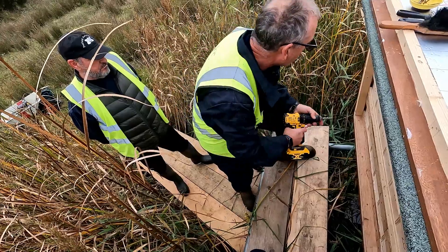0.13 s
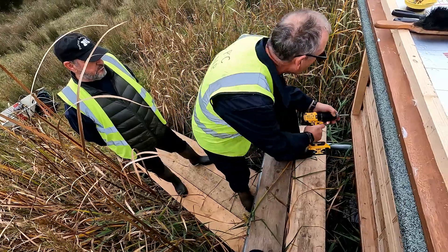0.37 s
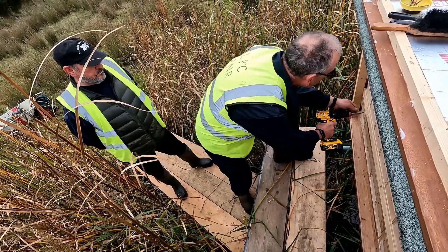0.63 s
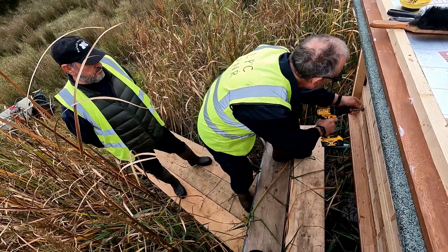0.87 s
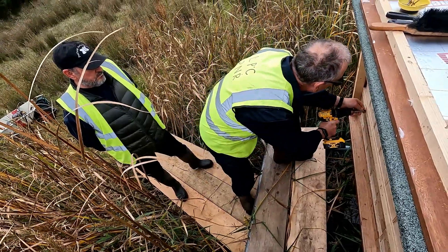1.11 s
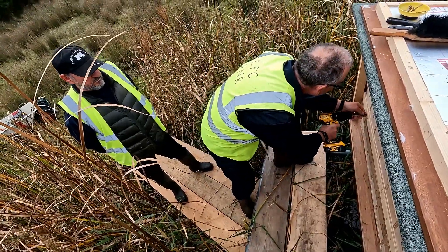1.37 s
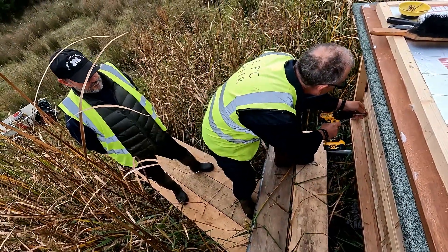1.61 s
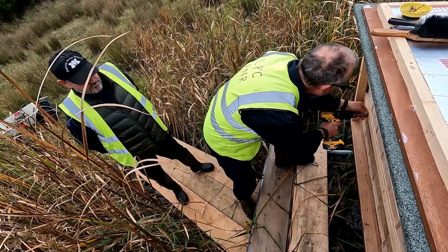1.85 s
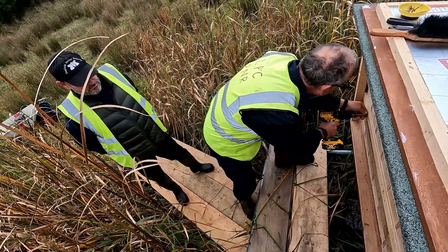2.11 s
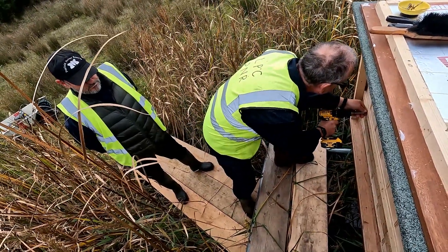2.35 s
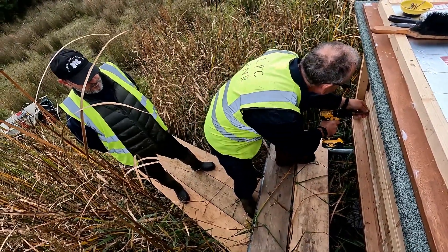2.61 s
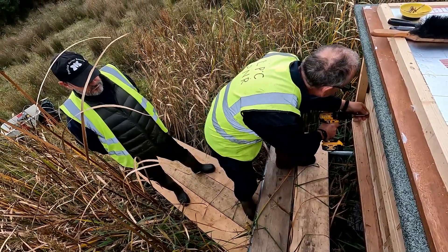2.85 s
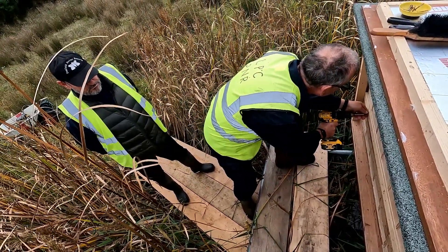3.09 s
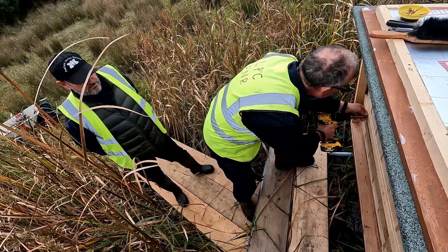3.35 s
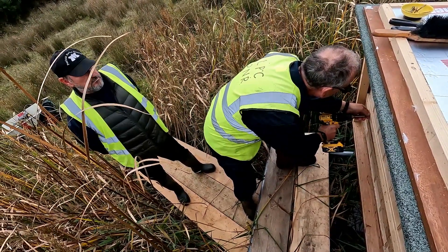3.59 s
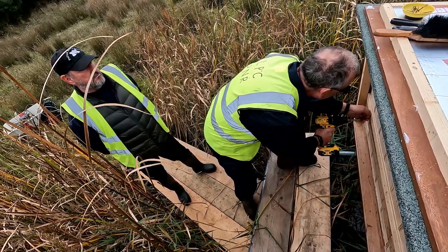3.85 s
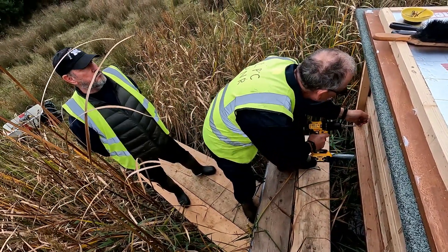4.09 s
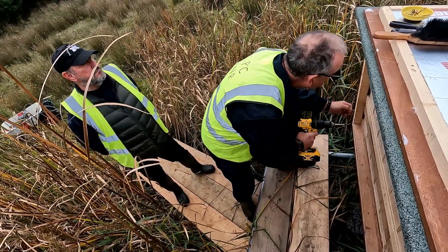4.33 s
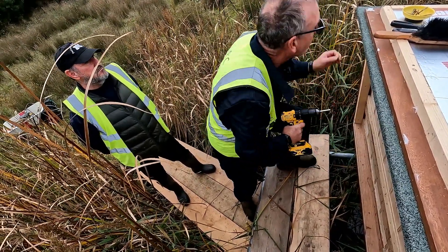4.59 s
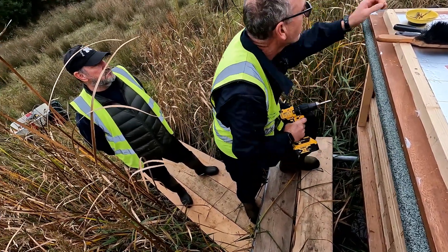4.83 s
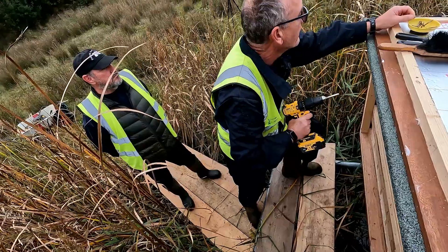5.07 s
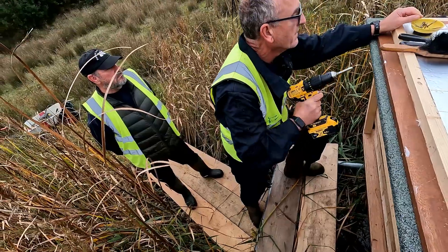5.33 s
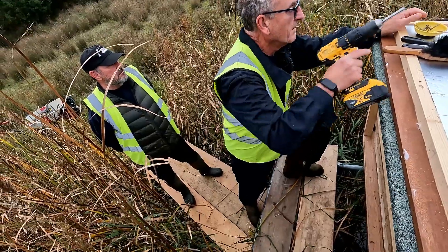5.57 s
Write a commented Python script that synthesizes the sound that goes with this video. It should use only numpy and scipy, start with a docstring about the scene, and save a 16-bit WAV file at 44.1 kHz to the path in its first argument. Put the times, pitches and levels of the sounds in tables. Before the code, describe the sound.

A handheld driver removes a screw from a wooden panel: faint cloth and ticks first, tumbling knocks and bit chatter on boards, a quick rising spin-up, a steady harsh whir of about one and a half seconds, and a sudden braked stop with tiny squeals. Afterwards come a latch-like click, soft wood knocks, cloth movement and small metal ticks. Open air, quiet low hum behind, close microphone, narrow stereo.

```python
"""A cordless driver backs a screw out of a wooden panel: it spins up, whirs, is braked and stops.
Coloured noise makes its gear rattle, and tones that follow the shaft speed make its whine.
The bit and a hand knock on the boards (fading modes), and steel parts tick (short noise bursts).
Behind them jackets rustle, a far engine hums and a broad outdoor rush goes on (tones and noise)."""
import sys
import numpy as np
from scipy import signal
from scipy.fft import rfft, irfft, next_fast_len
from scipy.io import wavfile
from scipy.ndimage import map_coordinates

SR = 44100
rng = np.random.default_rng(int(sys.argv[2]) if len(sys.argv) > 2 else 0)


def to_linear_factor(level_db):
    """Convert decibel levels (scalar or array-like) to linear amplitude factors."""
    exponent = np.asarray(level_db, float) / 20
    return 10 ** exponent


def to_wav(sig):
    """Store sig (one row per channel, or 1-D mono) as 16-bit WAV at the path in sys.argv[1].

    Samples outside -1..1 are clipped; the rate is SR.
    """
    pcm = np.clip(np.atleast_2d(sig), -1, 1) * 32767
    pcm = np.round(pcm).astype(np.int16)
    wavfile.write(sys.argv[1], SR, pcm.T)  # frames by channels


N = 251105
T = np.arange(N) / SR  # time of each sample [s]
BRAKE_S = 3.5695  # the brake bites
PLANET_TURNS = .273  # turns of a planet gear for each turn of the shaft
FULL_S, FULL_HZ = 2.165, 393.1  # time and shaft speed at the end of spin-up


def unit(x):
    """Scales a sound to rms 1."""
    return x / np.sqrt(np.mean(x ** 2) + 1e-20)


def along(points, hz):
    """Reads a table of (frequency, value) points on a log frequency axis."""
    point_hz, value = np.transpose(points)
    return np.interp(np.log(hz + 1), np.log(point_hz + 1), value)


def curves(rows):
    """Gives one value per sample for each column after the time."""
    s, *columns = np.transpose(rows)
    return [np.interp(T, s, column) for column in columns]


def within(rows):
    """True while the table lasts."""
    return (T >= rows[0][0]) & (T <= rows[-1][0])


def ramp(s, rise):
    """0 before s, 1 from s + rise on."""
    return np.clip((T - s) / rise, 0, 1)


def wobble(rate):
    """A smooth random curve with rate knots a second."""
    knots = rng.standard_normal(int(N * rate / SR) + 4)
    return map_coordinates(knots, [np.arange(N) * rate / SR])


def coloured(x, level_db):
    """Filters x by a level in dB for each frequency, then scales it to rms 1."""
    size = next_fast_len(N + 8192)
    gain = to_linear_factor(level_db(np.fft.rfftfreq(size, 1 / SR)))
    return unit(irfft(rfft(x, size) * gain, size)[:N])


def grit(spiky_db):
    """Noise whose samples differ much in size, like many small impacts."""
    return rng.standard_normal(N) * to_linear_factor(spiky_db * rng.standard_normal(N))


def add(track, s, db, sound):
    """Adds a sound with the given peak level, from time s on."""
    spot = track[round(s * SR):][:len(sound)]
    spot += to_linear_factor(db) * sound[:len(spot)] / np.abs(sound).max()


def ring(modes, attack):
    """One blow: every mode at a slightly new strength and pitch, rising during the contact."""
    t = np.arange(SR // 3) / SR
    hz, db, t60 = np.array(modes).T[..., None]
    db = db + 2 * rng.standard_normal(db.shape)
    hz = hz * (1 + .003 * rng.standard_normal(hz.shape))  # each blow detunes every mode slightly at random
    sign = (-1) ** np.arange(len(hz))[:, None]
    swings = to_linear_factor(db - 60 * t / t60) * np.sin(2 * np.pi * hz * t) * sign
    return np.sum(swings, axis=0) * (1 - np.exp(-t / max(attack, 1e-4)))


def burst(pitch_hz, spread, t60):
    """A snap at a pitch, then dry noise in a band around it; narrow bursts also ring at the pitch."""
    size = 4096
    t, hz = np.arange(size) / SR, np.fft.rfftfreq(size, 1 / SR) + 1
    octaves = np.log2(hz / pitch_hz)
    noise = rfft(rng.standard_normal(size))
    band = unit(irfft(noise / (1 + (octaves / max(spread, .03)) ** 2) ** 3))
    swing = np.sin(2 * np.pi * pitch_hz * t)
    band = band + max(.28 / max(spread, .1) - 1, 0) * swing  # rings if narrower than .28 octaves
    band = band + 1.8 * swing * np.exp(-t * pitch_hz * spread)  # the snap
    return band * to_linear_factor(-60 * t / t60) * (1 - np.exp(-t / 0.00042))


# shaft speed while the motor is ramped up: (time [s], speed [Hz])
SPEED_RAMP = [(1.84, 45), (1.86, 76), (1.88, 110), (1.9, 153), (1.92, 174), (1.942, 213), (1.96, 228),
              (1.99, 270), (2.03, 345), (2.06, 400)]


def shaft():
    """The shaft climbs along the ramp, settles at full speed, creeps up, and slows after the release."""
    lag_hz = np.exp((FULL_S - T) / .045)  # within 1 Hz of the settled speed at FULL_S
    braked_hz = 32000 * np.maximum(T - 3.538, 0) ** 2  # the trigger is let go at 3.538 s
    settled_hz = np.clip(FULL_HZ + 1.2 * (T - FULL_S) - lag_hz, 0, None)  # creeps 1.2 Hz a second
    ramp_hz, = curves(SPEED_RAMP)
    driven_hz = np.where(T < SPEED_RAMP[-2][0], ramp_hz, np.minimum(settled_hz, ramp_hz))
    return np.maximum(driven_hz - braked_hz, 0), braked_hz


# gear rattle of the driver: (time [s], level [dB])
RATTLE_LEVEL = [(1.786, -67), (1.797, -54), (1.85, -39.5), (1.9, -29), (1.97, -27.5), (2.03, -24),
                (2.3, -24), (3.5, -24), (3.59, -26), (3.6, -27.5), (3.625, -35), (3.645, -45),
                (3.675, -44.5), (3.695, -67.5)]
# spectrum of the driver with the panel sounding along: (frequency [Hz], level [dB per Hz])
PANEL_COLOUR = [(88, -49), (150, -49.5), (221, -8), (365, -14), (397, -21.5), (485, -18), (858, -8.5),
                (1240, -8.5), (1860, -0.5), (2820, 1.5), (3230, -8), (4020, -8), (4370, -12), (7340, -14.5),
                (8260, -30.5), (10700, -62.5), (18200, -120)]
# spectrum of the bare housing: (frequency [Hz], level [dB per Hz])
BARE_COLOUR = [(180, -41), (300, -12.5), (680, -14), (910, -10.5), (1290, -9.5), (2120, -5), (2580, -0.5),
               (3200, -3.5), (4190, -7.5), (4740, -10.5), (5800, -15), (7300, -18.5), (8260, -24.5),
               (9000, -66)]
# narrow resonances and notches of the housing: (frequency [Hz], width [Hz], level [dB])
HOUSING_PEAKS = [(1240, 33, -15), (1647, 280, -5.5), (1844, 470, 5), (2640, 150, 1), (2775, 98, -9),
                 (3390, 280, 6.5), (3650, 140, -3), (4000, 530, 6.5), (4180, 150, -9), (5430, 220, 3.5),
                 (5550, 170, -11.5), (6130, 200, 0), (6340, 210, -10.5), (7300, 230, -0.5)]
# panel modes that swell and fade on their own: (frequency [Hz], width [Hz], level to the rattle [dB])
PANEL_FLARES = [(1870, 160, -13), (2150, 130, -14), (2640, 130, -12.5), (4010, 180, -16.5)]


def rattle(turn):
    """Gear teeth shake the housing and, under load, the panel; the rattle pulses with gear and shaft."""
    def housing_db(hz):
        return sum(db / (1 + (2 * (hz - c) / w) ** 2) for c, w, db in HOUSING_PEAKS)

    load = ramp(1.94, 0.12) * (1 - ramp(BRAKE_S, 0.011))  # the bit takes load at 1.94 s
    through = np.clip(0.091 + (0.86 - 0.091) * load, 0, 1)  # power share through the panel, free to loaded
    laps = np.diff(np.floor(PLANET_TURNS * turn / (2 * np.pi)), prepend=0)
    strikes = laps * 6 * rng.uniform(-1, 1, N)  # a worn tooth strikes once a planet turn
    panel = coloured(unit(grit(spiky_db=3.4)) + strikes,
                     lambda hz: along(PANEL_COLOUR, hz) + housing_db(hz))
    bare = coloured(grit(spiky_db=0.5), lambda hz: along(BARE_COLOUR, hz) + housing_db(hz))
    for c, w, db in PANEL_FLARES:
        mode = coloured(grit(spiky_db=3), lambda hz: -10 * np.log10(1 + (2 * (hz - c) / w) ** 4))
        panel = panel + to_linear_factor(db + 3 * wobble(14)) * mode
    pulsing = 1 + 0.048 * np.sin(PLANET_TURNS * turn) + 0.029 * np.sin(turn)
    chatter = to_linear_factor(0.2 * wobble(24) + 0.9 * wobble(260))  # loose teeth catch unevenly
    level_db, = curves(RATTLE_LEVEL)
    both = np.sqrt(through) * unit(panel) + np.sqrt(1 - through) * bare
    return within(RATTLE_LEVEL) * to_linear_factor(level_db) * both * pulsing * chatter


# tones of motor poles and gear mesh: (multiple of shaft speed, level to the whine [dB])
WHINE_TONES = [(1, -20), (4, -12), (8, 0), (13.09, -18), (13.363, -21), (13.636, -28), (16, -21), (20, -36)]


def whine(turn, shaft_hz, braked_hz):
    """Motor poles and gear mesh sing at multiples of the shaft speed, weaker while it spins up."""
    below_hz = np.maximum(FULL_HZ - braked_hz - shaft_hz, 0)
    level_db = -33.3 + 2.2 * (T - FULL_S) - .11 * below_hz  # grows 2.2 dB a second
    tones = 0
    for multiple, db in WHINE_TONES:
        unsteady_db = db + 0.5 * wobble(25) + 0.3 * wobble(6)
        tones = tones + np.sqrt(2) * to_linear_factor(unsteady_db) * np.sin(multiple * turn)
    return (T < BRAKE_S) * (T > SPEED_RAMP[0][0]) * to_linear_factor(level_db) * tones


# pole tones that sweep through the housing on the way up: (multiple of shaft speed, level [dB])
SWEEP_TONES = [(12, -38), (16, -30.5), (20, -34)]
# what the housing lets out of them: (frequency [Hz], gain [dB])
SWEEP_GAIN = [(900, -30), (1500, -13), (2300, -8), (3300, -9), (3800, -2), (4250, 0), (4450, -15),
              (5200, -14), (5600, -40), (9000, -60)]


def sweeps(turn, shaft_hz):
    """Rising pole tones swell wherever the housing lets them out."""
    tones = 0
    for multiple, db in SWEEP_TONES:
        level_db = db + along(SWEEP_GAIN, multiple * shaft_hz) + 3 * wobble(110)
        tones = tones + np.sqrt(2) * to_linear_factor(level_db) * np.sin(multiple * turn + .8 * wobble(200))
    return tones * ramp(SPEED_RAMP[0][0], .02) * (1 - ramp(SPEED_RAMP[-2][0], .03))


# moments when the gears lose contact: (time [s], recovery [s], dip [dB])
GEAR_SLACK = [(1.911, .009, -10), (1.952, .014, -6), (3.5695, .011, -16)]


def driver():
    """Rattle, whine and sweeps share one shaft; all dip when the gears lose contact."""
    shaft_hz, braked_hz = shaft()
    turn = 2 * np.pi * np.cumsum(shaft_hz * (1 + .0003 * wobble(30))) / SR  # shaft angle [rad]
    slack = to_linear_factor(sum(dip_db * (T > s) * (1 - ramp(s, back)) for s, back, dip_db in GEAR_SLACK))
    return slack * (rattle(turn) + whine(turn, shaft_hz, braked_hz) + sweeps(turn, shaft_hz))


# squeals: (time [s], length [s], start pitch [Hz], end pitch [Hz], level [dB])
SQUEALS = [(1.872, .04, 4100, 4280, -37), (1.886, .022, 3400, 3450, -38), (1.985, .02, 2400, 2600, -34),
           (3.545, .0225, 2020, 1800, -30), (3.573, .015, 4000, 3950, -36), (3.583, .011, 2660, 2640, -26),
           (3.6, .028, 4150, 4400, -46)]


def squeal():
    """Thin, rough tones sound while the gears take up speed and briefly around the braking."""
    out, edge_s = np.zeros(N), 0.0027
    for s, length, from_hz, to_hz, db in SQUEALS:
        pitch_hz = from_hz + (to_hz - from_hz) * ramp(s, length)
        turn = 2 * np.pi * np.cumsum(pitch_hz * (1 + .012 * wobble(250))) / SR
        on = ramp(s, edge_s) * (1 - ramp(s + length, edge_s))
        out += on * np.sqrt(2) * to_linear_factor(db + 2.2 * wobble(170)) * np.sin(turn)
    return out


# the bit chatters in the screw head: (time [s], peak level [dB])
BIT_SKIDS = [(1.254, -35.5), (1.276, -38), (1.372, -35.5), (1.385, -32), (1.395, -30.5), (1.412, -37.5)]
# ringing of the bit: (frequency [Hz], level [dB], time to fall 60 dB [s])
BIT_MODES = [(1450, -1, .035), (2050, 0, .055), (2950, -4, .03), (3480, -2, .035), (4250, -13, .025)]


def skids():
    """Each skid makes the bit ring and scrapes dryly, 7 dB under the ring."""
    out = np.zeros(N)
    for s, db in BIT_SKIDS:
        add(out, s, db, ring(BIT_MODES, attack=0.00062))
        add(out, s, db - 7, burst(pitch_hz=2000, spread=1.0, t60=.06))
    return out


# blows: (time [s], peak level [dB], favoured pitch [Hz], spread of modes [octaves], loss a bounce [dB])
BLOWS = [(1.091, -33, 218, 0.6, 2.5), (1.253, -15.5, 480, 1.12, 19), (1.262, -27.5, 620, 0.48, 24),
         (1.273, -19.5, 604, 0.82, 20), (1.282, -22, 276, 0.19, 23), (1.297, -27.5, 700, 0.49, 14),
         (1.313, -32, 274, 0.72, 3.5), (1.373, -29, 600, 0.61, 22), (1.379, -26.5, 328, 0.99, 20),
         (1.389, -29, 420, 0.72, 26), (1.398, -30, 636, 0.47, 23), (1.41, -29.5, 400, 1.26, 10),
         (1.422, -32, 600, 0.72, 10), (1.512, -34, 230.2, 1.3, 2.5), (1.666, -26.5, 154, 0.95, 4.5),
         (1.667, -36, 670, 0.43, 3.5), (1.857, -33.5, 154, 0.96, 22), (3.898, -23, 356, 0.34, 19),
         (3.898, -34.5, 710, 0.33, 21), (3.914, -26, 361, 0.23, 24), (3.942, -47, 380, 0.23, 22),
         (3.955, -36.5, 379, 0.24, 22)]
# modes of the boards: (frequency [Hz], level [dB], time to fall 60 dB [s])
BOARD_MODES = [(154, -0.5, 0.19), (221.3, -0.5, 0.26), (261, -0.5, 0.11), (314.5, 3, 0.087),
               (381, -2, 0.15), (497, 1.5, 0.04), (533, 0.5, 0.088), (582, -0.5, 0.048), (636, 1, 0.081),
               (885, -4, 0.083), (784, -6.5, 0.076), (1136, 5, 0.046), (1200, -3, .04), (1364, 5.5, 0.038),
               (1565, 1, 0.06), (2036, 9.5, 0.043)]


def knocks():
    """Each blow bounces three times and favours board modes near its pitch; weak contacts are soft."""
    gap_s, shrink, dulls = .0213, 0.89, 0.866  # bounce timing, and pitch of a bounce over the one before
    out, (hz, level_db, t60) = np.zeros(N), np.transpose(BOARD_MODES)
    for start, first_db, pitch_hz, spread, loss_db in BLOWS:
        for k in range(4):
            s = start + k * gap_s * shrink ** k
            db = first_db - k * loss_db
            octaves = np.log2(hz / (pitch_hz * dulls ** k))
            near_db = -6 * (octaves / max(spread, .1)) ** 2
            contact_s = 0.0026 * to_linear_factor(-0.33 * (db + 30.0))  # 2.6 ms at -30 dB, longer when weaker
            modes = np.transpose([hz, level_db + near_db, t60])
            add(out, s, db, ring(modes, attack=contact_s / 4))
            crack_db = -33.5 + 1.14 * (db + 18)  # surface crack: -33.5 dB in a blow of -18 dB
            add(out, s, crack_db, burst(pitch_hz=1640, spread=1.3, t60=0.076))
    return out


# dry ticks: (time [s], peak level [dB], pitch [Hz], spread [octaves], time to fall 60 dB [s])
DRY_TICKS = [(.077, -43, 1940, .2, .023), (0.106, -34, 1900, 0.29, 0.049), (0.108, -41.5, 3000, .4, 0.018),
             (0.402, -31, 2670, 0.85, 0.061), (.411, -40.5, 3330, 0.88, .015), (.487, -50.5, 6500, .5, .01),
             (.622, -50, 6000, .5, .01), (0.679, -54, 6500, .5, .01), (.795, -41, 3800, 0.8, 0.0069),
             (1.678, -50, 5000, 0.9, .04), (1.794, -43, 3440, 0.9, .06), (1.853, -23, 1790, 1.8, 0.081),
             (3.653, -36.5, 3600, .7, .03), (3.655, -27, 3950, 0.11, .025), (3.657, -29, 3300, 1.1, 0.018),
             (3.656, -27.5, 2650, .25, .03), (3.656, -35, 1960, .15, 0.027), (3.671, -41, 2310, .2, 0.02),
             (3.674, -41, 3800, .3, 0.018), (3.898, -37.5, 1550, 0.16, .035),
             (3.898, -40.5, 2600, 0.66, .02), (3.912, -33.5, 3500, 0.14, 0.037),
             (3.912, -31, 1660, 0.48, 0.031), (3.913, -35, 2910, 0.088, .03), (4.951, -41, 5000, 0.91, .01),
             (5.158, -39.5, 2520, 0.44, 0.017), (5.161, -39, 1500, 0.65, 0.012),
             (5.219, -43, 2200, 0.49, 0.017), (5.321, -33, 3260, 0.61, 0.015),
             (5.321, -34, 1570, 0.21, .03), (5.327, -31.5, 1670, 0.23, 0.042),
             (5.327, -39, 3500, 0.49, 0.012), (5.407, -19, 2870, 1.27, 0.022),
             (5.453, -47, 3300, 0.68, 0.011), (5.501, -39, 2790, 1.1, 0.013),
             (5.527, -49, 2820, 0.92, .013), (5.627, -38, 2600, 0.5, .015),
             (5.6348, -29.5, 2710, 0.23, 0.011), (5.6351, -33, 1890, .3, 0.011),
             (5.686, -42, 4000, .4, .012)]


def ticks():
    """Small hard contacts are dry bursts of noise."""
    out = np.zeros(N)
    for s, db, pitch_hz, spread, t60 in DRY_TICKS:
        add(out, s, db, burst(pitch_hz, spread, t60))
    return out


# screw on steel: (time [s], peak level [dB])
SCREW_CLINKS = [(5.409, -24)]
# ringing of the steel: (frequency [Hz], level [dB], time to fall 60 dB [s])
STEEL_MODES = [(1490, -2, .09), (1950, -3, .03), (4720, -16, .07), (6760, -2, .04)]


def clinks():
    """The screw hits steel, which rings on in a few modes."""
    out = np.zeros(N)
    for s, db in SCREW_CLINKS:
        add(out, s, db, ring(STEEL_MODES, attack=0.00012))
    return out


# moments of movement: (middle [s], half length [s], level [dB])
CLOTH_RUSTLES = [(0.47, 0.36, -55), (3.7, 0.081, -66), (4.438, 0.091, -54.5), (4.714, 0.25, -65.5),
                 (5.586, 0.27, -56.5)]
# spectrum of the jackets: (frequency [Hz], level [dB per Hz])
CLOTH_COLOUR = [(900, -2), (1800, 5.5), (2900, 8.5), (4200, -3), (5500, -12.5), (7300, -10.5),
                (8400, -34.5)]


def jackets():
    """Cloth crackles when someone moves: spiky noise that swells over a faint floor."""
    moving = to_linear_factor(-62)  # when nobody moves
    for s, half, db in CLOTH_RUSTLES:
        moving = moving + to_linear_factor(db) * np.exp(-((T - s) / half) ** 2)
    cloth = coloured(grit(spiky_db=6), lambda hz: along(CLOTH_COLOUR, hz))
    return moving * to_linear_factor(1.2 * wobble(30)) * cloth


# far engine: (time [s], firing rate [Hz], level [dB])
ENGINE_RUN = [(0, 94.4, -55), (.95, 101, -52), (1.3, 95.76, -52.5), (2.0, 97.63, -53), (3.6, 96.43, -57),
              (5.0, 96.64, -55), (5.69, 97.6, -55.5)]
# exhaust tones: (multiple of firing rate, level to the engine [dB])
EXHAUST_TONES = [(.5, -19.5), (1, -3), (1.5, -6), (2, -1), (3, -4)]


def engine():
    """Unsteady exhaust tones at multiples of the firing rate hum far away."""
    firing_hz, level_db = curves(ENGINE_RUN)
    turn = 2 * np.pi * np.cumsum(firing_hz * (1 + 0.012 * wobble(12))) / SR
    tones = 0
    for multiple, db in EXHAUST_TONES:
        tones = tones + np.sqrt(2) * to_linear_factor(db + 3.8 * wobble(14)) * np.sin(multiple * turn)
    return to_linear_factor(level_db) * tones


# spectrum of the outdoor rush: (frequency [Hz], level [dB per Hz])
RUSH_COLOUR = [(15, -56.5), (25, -47.5), (86, -1), (162, -1), (192, -0.5), (222, -10.5), (361, -6),
               (532, -9), (646, -9.5), (1270, -12.5), (1400, -14.5), (2070, -16.5), (8260, -57.5),
               (10700, -80.5), (18200, -120)]


def outdoor_rush():
    """A smooth far rush: coloured noise around -47.5 dB whose level drifts a little."""
    noise = coloured(rng.standard_normal(N), lambda hz: along(RUSH_COLOUR, hz))
    return to_linear_factor(-47.5 + 0.94 * wobble(6.7)) * noise


def stereo_width(x, width):
    """The same sound with scrambled phases, opposite in the two channels."""
    hz, _, z = signal.stft(x, SR, nperseg=256)
    phases = np.exp(2j * np.pi * rng.random(z.shape))
    scrambled = z * phases * to_linear_factor(along(width, hz))[:, None]
    return signal.istft(scrambled, SR, nperseg=256)[1][:N] * np.array([[1], [-1]])


# stereo width of the driver, squeals, skids, ticks and clinks: (frequency [Hz], side over middle [dB])
TOOL_WIDTH = [(30, -26.5), (70, -11.5), (200, -6.5), (500, -12.5), (900, -12), (1540, -18.5), (2650, -23),
              (4550, -16), (7810, -6.5)]
# stereo width of all else: (frequency [Hz], side over middle [dB])
REST_WIDTH = [(60, -40.5), (180, -61.5), (500, -38.5), (1500, -32.5), (2650, -35), (4550, -15), (7810, -9)]


def scene():
    """The tool is slightly to the right; the two channels carry nearly the same sound."""
    near = driver() + squeal() + skids() + ticks() + clinks()
    rest = knocks() + jackets() + engine() + outdoor_rush()
    near_both = near * to_linear_factor([[-.35], [.35]]) + stereo_width(near, TOOL_WIDTH)  # left, right [dB]
    return near_both + rest + stereo_width(rest, REST_WIDTH)


def roll_off(x):
    """The treble ends steeply here."""
    return signal.sosfilt(signal.butter(12, 8410, fs=SR, output="sos"), x)


def record(dry):
    """Stores the finished two-channel mix, with some loss of detail and treble."""
    return roll_off(dry)


dry = scene()
out = record(dry)
to_wav(out)
```